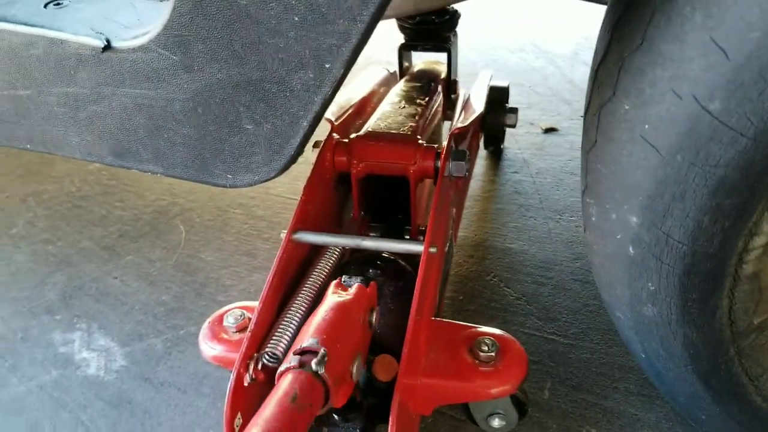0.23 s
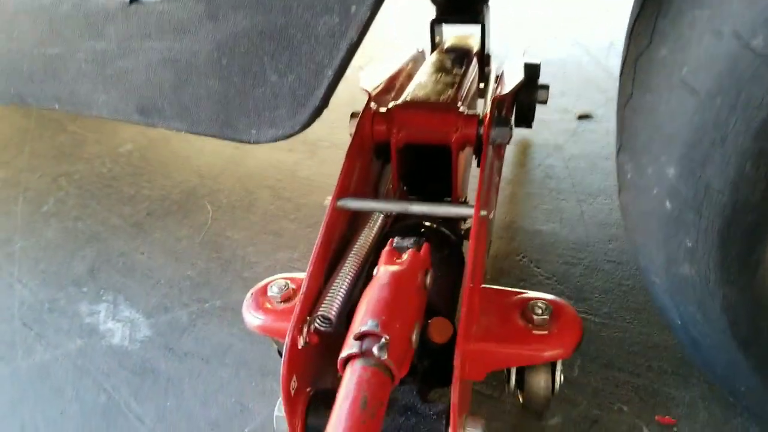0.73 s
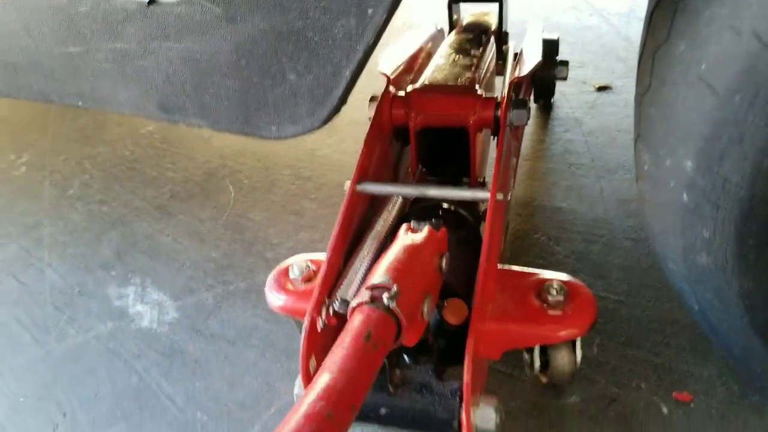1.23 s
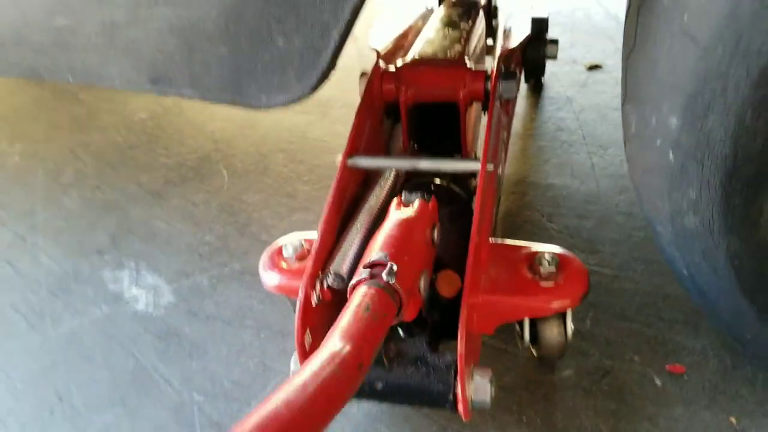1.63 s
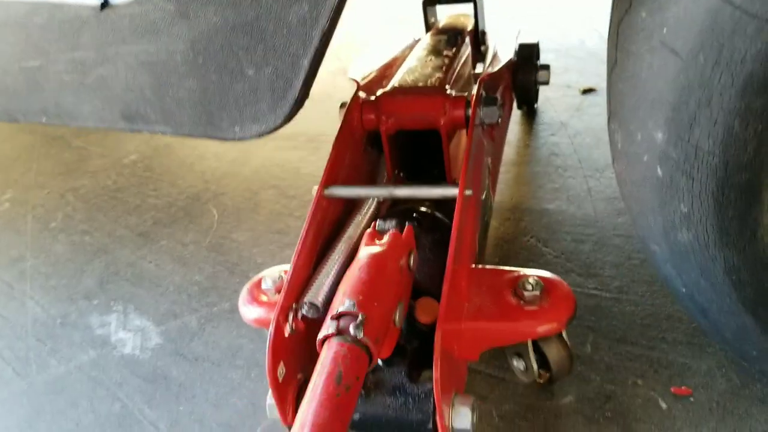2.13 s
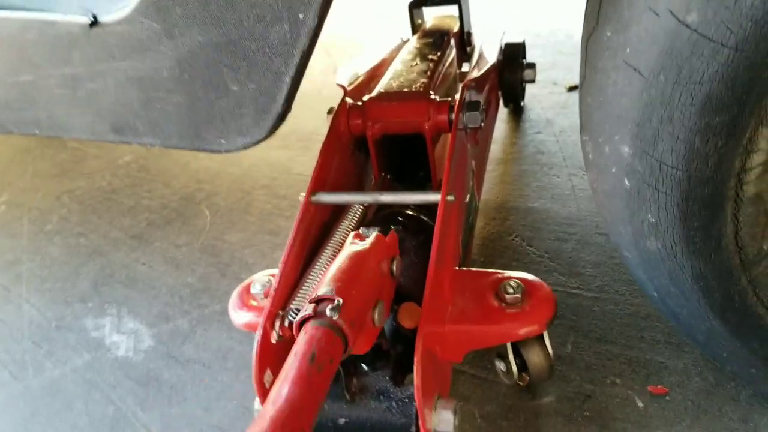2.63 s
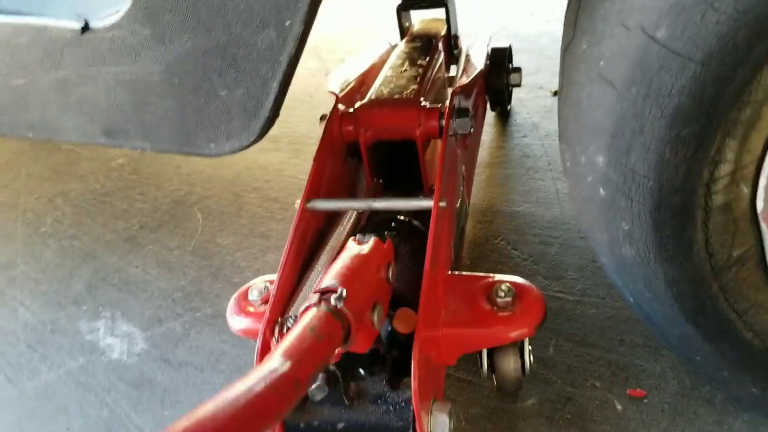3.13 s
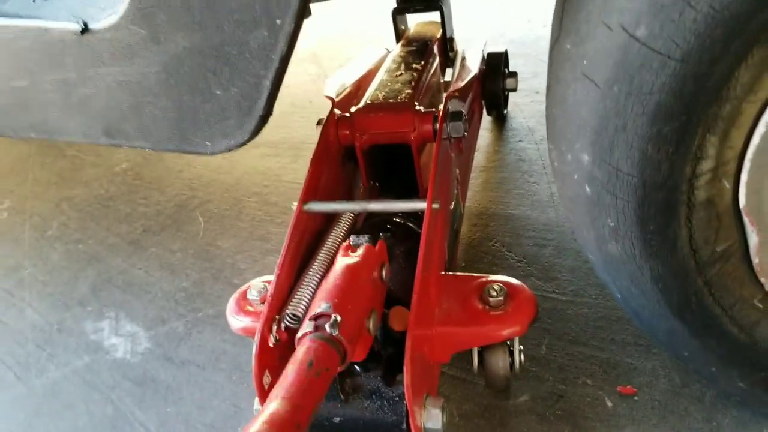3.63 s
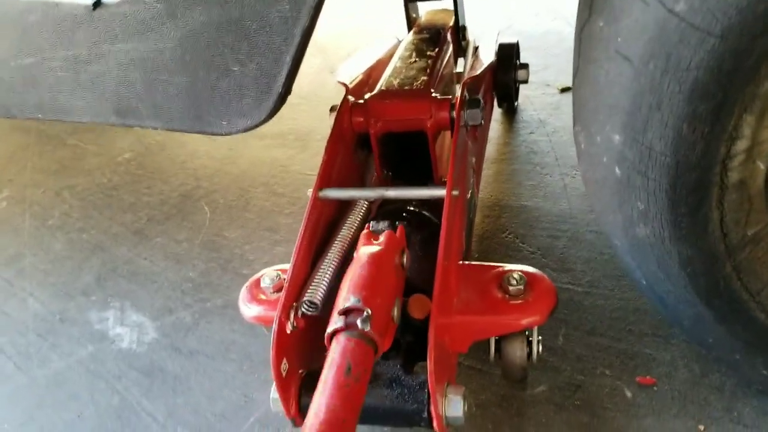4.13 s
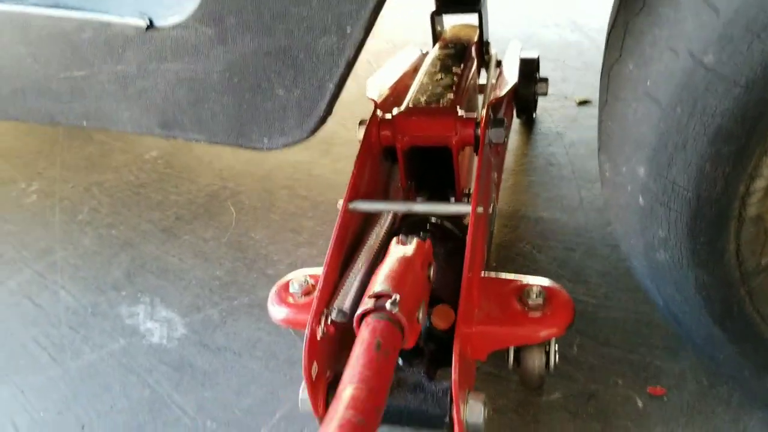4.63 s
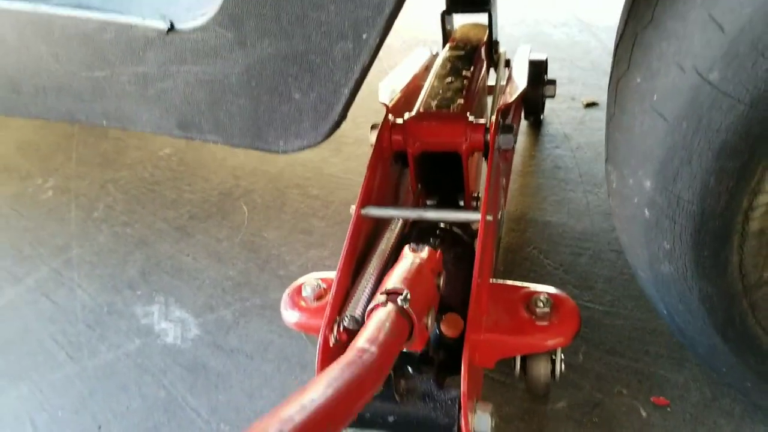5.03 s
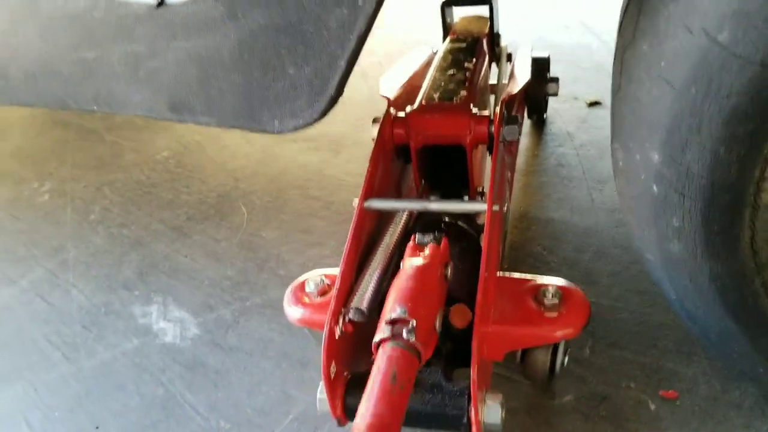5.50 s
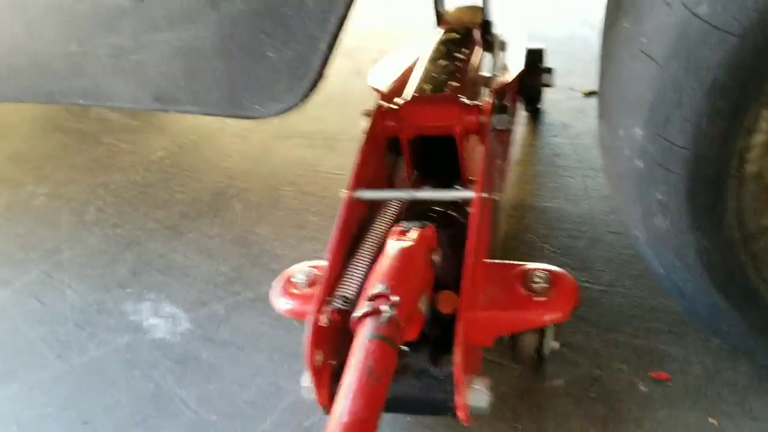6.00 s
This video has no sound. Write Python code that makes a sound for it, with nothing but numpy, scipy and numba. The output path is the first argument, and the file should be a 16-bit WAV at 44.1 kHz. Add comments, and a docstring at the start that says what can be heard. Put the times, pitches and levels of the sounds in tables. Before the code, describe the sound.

Close to a phone in a garage, a steel floor jack is pumped quickly. Loose links and pins clack and rattle from the start, then a short low groan leads into hard double knocks near 0.7 s and another at 0.9. Irregular clanks, raspy rubbing and faint oil hiss continue with each swing, with a brief squeak around 4.4 s, over quiet room noise.

```python
"""A steel floor jack on a garage floor, its handle pumped fast a metre from a phone with two microphone ports.
From the start, play in the linkage clacks as noise bursts that ring frame, links and pins; as the handle swings
oil hisses, the piston rubs and the frame rocks on its wheels, all as shaped noise. A joint groans low at 0.6 s,
just before the first big knock, and one squeaks at 4.4 s: both are unsteady stick-slip tones. Delay lines let the
garage ring briefly after each sound, over quiet background noise."""
import sys
import numpy as np
from scipy import signal
from scipy.fft import rfft, irfft
from scipy.io import wavfile
from scipy.ndimage import uniform_filter1d
from numba import njit

SR = 44100
rng = np.random.default_rng(int(sys.argv[2]) if len(sys.argv) > 2 else 0)


def to_wav(s):
    """Save 16-bit WAV."""
    ch = np.atleast_2d(s).T  # columns
    pcm = np.round(np.clip(ch, -1, 1) * 32767)  # PCM
    wavfile.write(sys.argv[1], SR, pcm.astype(np.int16))


N = 276066

# ringing modes of the steel frame, struck by clacks and rubbed by the piston: f/Hz, t60/s
FRAME_MODES = [(1570, 0.088), (1860, 0.04), (2180, 0.089), (2500, 0.065), (2830, 0.14), (3000, 0.057),
               (3240, 0.086), (4350, 0.0167)]


def undb(db):
    """dB to gain."""
    return 10 ** (np.asarray(db) / 20)


def unit(x):
    """Scaled to rms 1."""
    return x / np.sqrt(np.mean(x ** 2))


def columns(table):
    """Table columns drawn over the whole time."""
    s, *cols = np.transpose(table)
    return [np.interp(np.arange(N) / SR, s, c) for c in cols]


def band(x, lo_hz, hi_hz):
    """Band-pass."""
    return signal.sosfilt(signal.butter(2, [lo_hz, min(hi_hz, .45 * SR)], "band", fs=SR, output="sos"), x)


def highpass(x, order, hz):
    """Takes away what lies below hz."""
    return signal.sosfilt(signal.butter(order, hz, "high", fs=SR, output="sos"), x)


def decay(t, t60):
    """Exponential fade that loses 60 dB in t60 seconds."""
    return 1000. ** (-t / t60)


def walk(rate):
    """Random levels held 1 / rate s and slewed twice."""
    k = int(SR / rate)
    held = np.repeat(rng.standard_normal(N // k + 1), k)
    return unit(uniform_filter1d(uniform_filter1d(held, k), k)[:N])


def grit(scatter_db, size):
    """Noise whose samples have long-tailed sizes: many small contacts, a few sharp ones."""
    return rng.standard_normal(size) * undb(scatter_db * rng.exponential(size=size))


def struck_spot(frame_hz):
    """Short-lived resonances of the struck spot, one response per row, that colour the whole clack."""
    t = np.arange(512) / SR
    colour = 0.25 * rng.standard_normal((2, len(t))) * decay(t, 0.007)
    centre = undb(-30.5) * np.sin(2 * np.pi * frame_hz * t) * decay(t, 0.039)
    return (t == 0) + colour + centre


def clacks():
    """Each clack is a burst of chatter; it strikes every part at a new place, so mode strengths change."""
    # blows in the linkage: t/s, frame level/dB, brightness as pins over frame/dB,
    # centre of the frame's response f/Hz, chatter t60/s
    blows = [(0.0283, -27, -5.5, 3200, 0.018), (0.0675, -31, 7.5, 2970, 0.015),
             (0.0996, -30.5, 11.5, 3100, 0.024), (0.1262, -20.5, 8.5, 3230, 0.022),
             (0.1365, -15, 1, 3120, 0.008), (0.267, -40, 3, 2120, 0.015), (0.304, -32.5, -9, 2350, 0.015),
             (0.3575, -27.5, 13, 3160, 0.014), (0.3914, -26.5, -5, 1850, 0.01),
             (0.4056, -31, 1, 1500, 0.028), (0.5663, -20.5, -22, 3650, 0.0094),
             (0.6735, -13.5, -26.5, 2580, 0.035), (0.6917, -3, -15, 3040, 0.028),
             (0.7093, -7.5, -11, 3120, 0.022), (0.728, -17.5, 1, 2630, 0.035),
             (0.8982, -2, -10.5, 3220, 0.021), (1.031, -20.5, 9.5, 3430, 0.014),
             (1.056, -22.5, 2, 2850, 0.014), (1.2273, -35.5, -11, 3440, 0.018),
             (1.3308, -38, 8, 2100, 0.03), (1.49, -36, -49.5, 2080, 0.02),
             (1.5422, -23.5, -45, 2540, 0.015), (1.577, -23.5, -40, 2180, 0.018),
             (1.702, -14, 3, 2620, 0.0087), (1.7174, -35.5, 16.5, 2850, 0.013),
             (1.9744, -35, 6.5, 1630, 0.018), (2.049, -30, 9, 2720, 0.019), (2.135, -25, -52, 2130, 0.043),
             (2.311, -32.5, -1, 2000, 0.01), (2.3727, -22.5, -15, 2680, 0.012),
             (2.389, -23, -5, 1580, 0.025), (2.406, -25, 8.5, 2280, 0.023),
             (2.4934, -32.5, -0.5, 3120, 0.012), (2.6317, -22.5, -3.5, 1780, 0.026),
             (2.6632, -36.5, 17, 2310, 0.012), (2.673, -20.5, -46, 3170, 0.015),
             (2.826, -25.5, -5, 1370, 0.014), (2.8494, -5, -9.5, 3280, 0.0096),
             (2.915, -17, -32, 3080, 0.013), (2.954, -25.5, -17, 2770, 0.013),
             (3.023, -26.5, 8, 1710, 0.015), (3.048, -16.5, 8, 2794, 0.013), (3.0845, -23, 1, 2540, 0.0035),
             (3.2575, -29.5, 8.5, 3440, 0.013), (3.299, -36, 14, 1580, 0.011),
             (3.307, -25.5, 5.5, 1740, 0.05), (3.4436, -18.5, -7, 2640, 0.019),
             (3.485, -19.5, -8, 2230, 0.018), (3.648, -23, 2, 2000, 0.024), (3.6587, -21.5, 0, 1570, 0.013),
             (3.687, -27.5, 1, 1580, 0.026), (3.7316, -27, -25, 2420, 0.01),
             (3.9374, -23.5, 6.5, 1750, 0.018), (4.0053, -26.5, -6, 1400, 0.023),
             (4.019, -17.5, -9, 3200, 0.01), (4.1772, -30, -35, 1930, 0.032),
             (4.276, -25.5, -20, 2130, 0.024), (4.284, -12.5, 7, 1940, 0.022),
             (4.304, -24.5, 5, 2250, 0.029), (4.3109, -17, 8.5, 2860, 0.011),
             (4.5431, -5.5, -4.5, 5660, 0.0081), (4.5934, -40, 19, 3240, 0.021),
             (4.6062, -24, 13, 1530, 0.021), (4.623, -28.5, 23.5, 2860, 0.01),
             (4.6543, -12, -41, 4200, 0.0067), (4.6596, -15, -33, 3800, 0.0069),
             (4.9075, -29, -9, 2220, 0.062), (4.92, -29, -19, 3250, 0.014), (4.973, -28, -8, 2314, 0.011),
             (5, -25.5, 7.5, 3570, 0.014), (5.197, -29.5, -5, 2026, 0.02), (5.23, -32, 9, 3300, 0.026),
             (5.2512, -31.5, 1, 1680, 0.16), (5.2924, -27, 5.5, 1470, 0.018),
             (5.4424, -18.5, -24, 1670, 0.011), (5.558, -25, -2.5, 1760, 0.027),
             (5.6218, -19.5, -40, 3247, 0.011), (5.633, -26.5, -5, 2040, 0.021),
             (5.651, -25, 8.5, 2350, 0.017), (5.7133, -24.5, 5, 1750, 0.02), (5.767, -30, -14, 2086, 0.045),
             (5.8273, -24, 6, 3150, 0.033), (5.8626, -15, 10, 1810, 0.015),
             (5.9221, -14.5, -12, 2810, 0.019), (5.966, -21, -18, 2820, 0.019),
             (6.1991, -25.5, 0, 1786, 0.031)]
    # ringing modes of the links, then of the pins: f/Hz, t60/s
    link_modes = [(5200, 0.066), (5700, 0.025)]
    pin_modes = [(10590, 0.1), (12480, 0.037), (13970, .04)]
    # broad response, one row each for links and pins: low edge f/Hz, high edge f/Hz
    bands_hz = [(4500, 9370), (10800, 15720)]
    # crowded small modes of frame, links, pins, heard as a noisy tail: t60/s
    dense_t60_s = [0.21, 0.1, 0.12]
    links_db, links_follow = -2.5, 0.8  # links over frame; share of the brightness that they follow
    ring_db, mode_scatter_db = -45, 3
    near_db, near_width = 11, 0.04  # boost of modes near the clack's centre; its reach (log ratio)
    usual_t60_s, tail_db, tail_slope = 0.025, 17.5, 6  # tail of a usual clack; dB per doubled chatter
    bounce_db, bounce_s, settle_s = 3.5, 0.002, 0.012

    size = 2 ** 13
    t, out = np.arange(size) / SR, np.zeros((2, N + size))
    parts = []
    for modes in (FRAME_MODES, link_modes, pin_modes):
        hz, t60 = np.transpose(modes)[:, :, None]
        parts.append((hz[:, 0], rfft(np.sin(2 * np.pi * hz * t) * decay(t, t60), 2 * size)))
    rise = (1 - np.exp(-t / 0.0034)) ** 2  # the clack swells in over a few milliseconds

    for s, frame_db, bright_db, frame_hz, chatter in blows:
        parts_db = frame_db + np.array([0, links_db + links_follow * bright_db, bright_db])
        # after the first contact the chatter breaks into uneven lumps
        bounces = np.interp(t / bounce_s, np.arange(size // 64), rng.standard_normal(size // 64))
        lumps = undb(bounce_db * np.minimum(t / settle_s, 1) * bounces)
        blow = grit(2, (2, size)) * lumps * rise * decay(t, chatter)
        blow_f = rfft(blow, 2 * size)
        struck = np.sqrt(np.sum(blow ** 2) / SR)
        tail_gain = undb(tail_db + tail_slope * np.log2(chatter / usual_t60_s)) * struck
        spot = struck_spot(frame_hz)
        edges_hz = [(frame_hz / 2.39, frame_hz * 1.7), *bands_hz]
        sound = 0
        for (hz, rings), edges, db, t60 in zip(parts, edges_hz, parts_db, dense_t60_s):
            near = near_db * np.exp(-(np.log(hz / frame_hz) / near_width) ** 2)
            scatter = mode_scatter_db * rng.standard_normal((2, len(rings)))
            ring = undb(ring_db + near + scatter) @ rings
            tail = tail_gain * rng.standard_normal((2, size)) * lumps * rise * decay(t, t60)
            noise = signal.fftconvolve(blow + tail, spot, axes=1)[:, :size]
            part = band(noise + irfft(blow_f * ring)[:, :size], *edges)
            # levelled by its loudest 2 ms
            power = uniform_filter1d(part ** 2, size=88).max(axis=1, keepdims=True)
            sound = sound + part * undb(db) / np.sqrt(6 * power)
        i = int(s * SR)
        out[:, i:i + size] += sound
    out = highpass(out[:, :N], 3, 972)  # the linkage is too small to sound below this
    return out * undb([[0], [-1]])


def swings():
    """Gains of hiss, rub and rocking as the handle moves: most swings swell and fade."""
    # swings of the handle: start t/s, fastest t/s, end t/s (two rows have no ordered end),
    # effort as rub level/dB
    handle = [(-0.01, 0.294, 2.1, -68.5), (1.197, 1.305, 0.94, -78), (1.482, 1.585, 1.74, -61),
              (2.112, 2.155, 2.44, -51), (2.216, 2.482, 2.8, -62), (2.672, 2.857, 3.07, -45.5),
              (2.958, 3.306, 6.9, -59.5), (3.353, 3.44, 3.62, -44), (3.544, 3.674, 3.3, -52),
              (3.93, 4.086, 4.26, -45.5), (4.25, 4.333, 4.42, -52.5), (4.522, 4.68, 4.92, -43),
              (4.865, 4.944, 5.09, -50.5), (5.212, 5.296, 5.33, -47), (5.344, 5.46, 5.59, -44),
              (5.547, 5.7, 5.73, -50), (5.819, 5.93, 6.17, -41.5), (6.13, 6.213, 6.4, -49)]
    # how closely hiss, rub and rocking (rows) follow the speed of the handle: exponent
    swell = np.array([[.55], [.8], [.5]])
    full_effort_db = -43
    hiss_db, hiss_slope = -44.5, 1.88  # gain at full effort; dB lost per dB of effort
    rock_db, rock_slope = -41, 0.52  # likewise
    t, power = np.arange(N) / SR, 0
    for start, fastest, end, effort_db in handle:
        turn = np.clip(fastest, start + 1 / SR, end - 1 / SR)
        speed = np.sin(np.pi * np.interp(t, [start, turn, end], [0, .5, 1]))
        ease = effort_db - full_effort_db
        db = [hiss_db + hiss_slope * ease, effort_db, rock_db + rock_slope * ease]
        power = power + undb(db)[:, None] ** 2 * np.abs(speed) ** (2 * swell)
    return np.sqrt(power)


def strokes(hiss_gain, rub_gain):
    """Oil hisses through the valve; the piston and loose parts rub and rattle in the frame."""
    high_hiss = unit(band(grit(2.2, (2, N)), 9240, 14900))
    low_hiss = unit(band(grit(2.1, (2, N)), 3930, 8300))
    hiss = high_hiss + undb(-2.5) * low_hiss
    # loose parts tick at random moments, 90 a second, each tick losing 60 dB in 20 ms
    tick_sizes = undb(4.5 * np.minimum(rng.exponential(size=N), 3.5))
    ticks = (rng.random(N) < 90 / SR) * tick_sizes
    rattle = 1 + 0.45 * signal.lfilter([1], [1, -decay(1 / SR, 0.02)], ticks)
    contacts = grit(2.1, (2, N)) * rattle * undb(3.5 * walk(70))
    # the rub is broad noise plus as much noise ringing in the frame modes
    rasp = sum(unit(band(contacts, hz - 2 / t60, hz + 2 / t60)) for hz, t60 in FRAME_MODES)
    rub = unit(unit(band(contacts, 960, 3560)) + unit(rasp))
    flutter = undb(2.0 * walk(40) + 0.5 * walk(8.1))
    return hiss * hiss_gain * rattle ** 0.85 * flutter + rub * rub_gain


def rocking(gain):
    """Uneven jolts through the wheels, and landings on the floor, drum the frame's low resonances."""
    # low resonances of the frame on its wheels: f/Hz, width/Hz, relative level/dB
    wheels = [(56, 28, -7.5), (86.2, 24, -1), (167.4, 39, 3), (236.4, 21, 1.5), (319, 91, -2.5),
              (628, 363, -2)]
    # frame lands on the floor: t/s, gain/dB, t60/s
    thuds = [(0.691, -11.5, 0.11), (0.709, -19, 0.55), (1.53, -28.5, 0.13), (2.846, -22.5, 0.27),
             (3.371, -32.5, 0.074), (3.433, -32, 0.5), (4.093, -25.5, 0.13), (4.677, -17.5, 0.028),
             (5.443, -24, 0.088), (5.896, -24, 0.076)]
    # lowest mode of the frame, sounded by landings: f/Hz, width/Hz, gain/dB
    body_mode = (837, 50, -14.5)
    jolts = grit(0.39, (2, N)) * undb(2.54 * walk(14))
    drum = unit(sum(undb(db) * unit(band(jolts, hz - w / 2, hz + w / 2)) for hz, w, db in wheels))
    t = np.arange(N) / SR
    landings = sum(undb(db) * (t > s) * decay(np.maximum(t - s, 0), t60) for s, db, t60 in thuds)
    # every landing also sounds the stiffer, higher body of the frame
    body = unit(band(grit(1.5, (2, N)), 413, 834)) * undb(-10.5)
    hz, w, db = body_mode
    body = body + undb(db) * unit(band(jolts, hz - w / 2, hz + w / 2))
    thud = band(drum, 114, 790) * undb(-11.0) + body
    return drum * gain + thud * uniform_filter1d(landings, size=500)


def slip(table, partials_db, rough, fade):
    """Quick stick-slip: an unsteady tone; with fade, higher partials fall away faster as it weakens."""
    hz, db = columns(table)
    t = np.arange(N) / SR
    gate = np.clip((t - table[0][0]) / 0.0022, 0, 1) * np.clip((table[-1][0] - t) / 0.0074, 0, 1)
    phase = 2 * np.pi * np.cumsum(hz * (1 + rough * walk(1500))) / SR
    drop = db - db.max()
    tone = sum(undb(p + fade * k * drop) * np.sin((k + 1) * phase) for k, p in enumerate(partials_db))
    return np.sqrt(2) * gate * tone * undb(db + 2.5 * walk(500) + 2.5 * walk(120))


def groan():
    """A joint sticks and slips slowly: a low, rough tone just before the first big knock."""
    # pitch and level of the groan: t/s, f/Hz, gain/dB
    glide = [(.58, 340, -53.5), (.61, 371, -39), (.65, 398, -46), (.68, 366, -38.5)]
    # partials 1-4: gain/dB
    partials_db = [1, -13, -25, -12]
    return slip(glide, partials_db, rough=0.08, fade=0)


def squeak():
    """A joint sticks and slips fast: a high tone that dulls as it dies."""
    # pitch and level of the squeak: t/s, f/Hz, gain/dB
    glide = [(4.413, 4550, -26), (4.433, 4310, -30), (4.446, 4300, -44.5), (4.5, 4350, -60)]
    # partials 1-3: gain/dB
    partials_db = [0, -6, -5]
    return slip(glide, partials_db, rough=0.025, fade=0.035)


@njit
def walls(x, lags, gain, damp):
    """Eight delay lines that feed each other, duller on every round."""
    line, soft, out = np.zeros((8, 4096)), np.zeros(8), np.zeros((2, len(x)))
    for i in range(len(x)):
        total = 0.
        for k in range(8):
            soft[k] += (1 - damp) * (gain[k] * line[k, (i - lags[k]) & 4095] - soft[k])
            total += soft[k]
            out[k % 2, i] += soft[k]
        for k in range(8):
            line[k, i & 4095] = x[i] + soft[k] - total / 4
    return out


def garage(x):
    """The room's answer: echoes between the walls, thinned in the bass."""
    t60_s = 0.57  # before the damping of the treble
    lags = rng.integers(250, 2200, 8)  # samples
    echoes = walls(x, lags, undb(-60 * lags / SR / t60_s), 0.15)
    return undb(-21) * highpass(echoes, 1, 200)


def air():
    """Quiet garage background: steady noise shaped by a drawn spectrum."""
    # spectrum of the background: f/Hz, relative level per Hz/dB
    spectrum = [(30, 12.5), (204, 9.5), (300, 9.5), (2750, -7.5), (7470, -17), (8520, -13.5), (14400, -9.5),
                (16000, -21)]
    f = np.maximum(np.fft.rfftfreq(N, 1 / SR), 1)
    hz, db = np.transpose(spectrum)
    shape = undb(np.interp(np.log(f), np.log(hz), db))
    return unit(irfft(rfft(rng.standard_normal((2, N))) * shape, N)) * undb(-55)


def ports(mid, side):
    """Left and right: alike in the bass, unrelated in the treble; each band leans a little to one side."""
    # where the ports differ in level: low edge f/Hz, high edge f/Hz (held under 0.45 SR), share leaning left
    lean = [(101, 2700, 0.089), (4700, 25000, -0.16), (10500, 48000, 0.1)]
    side = highpass(side, 1, 900)  # above this the two ports hear different faces of the jack
    side = side + sum(share * band(mid, lo_hz, hi_hz) for lo_hz, hi_hz, share in lean)
    return np.array([mid + side, mid - side])


def scene():
    """The jack, the garage's answer and its background."""
    hiss_gain, rub_gain, rock_gain = swings()
    # rows: what both ports share, what differs between them
    jack = clacks() + strokes(hiss_gain, rub_gain) + rocking(rock_gain)
    jack = jack + squeak() + groan()
    mid, side = jack + garage(jack[0]) + air()
    return ports(mid, side)


def record(dry):
    """The microphone loses the deep bass and dips near 9 kHz; the phone rounds the loudest peaks and cuts the top."""
    top_hz, soft_top = 15800, 1.6  # soft_top: the level that the loudest peaks bend towards
    x = highpass(dry, 2, 45)
    x = x - 0.5 * signal.sosfilt(signal.butter(1, [8300, 10000], "band", fs=SR, output="sos"), x)
    rounded = soft_top * np.tanh(x / soft_top)
    return signal.sosfilt(signal.ellip(10, .2, 70, top_hz, fs=SR, output="sos"), rounded)


dry = scene()
out = record(dry)
to_wav(out)
```